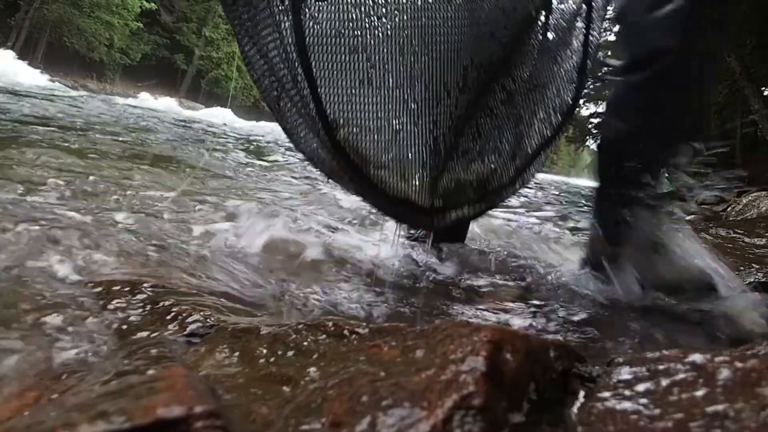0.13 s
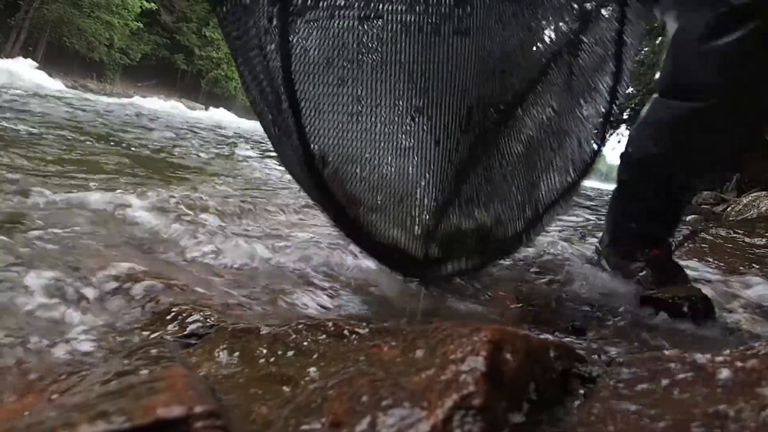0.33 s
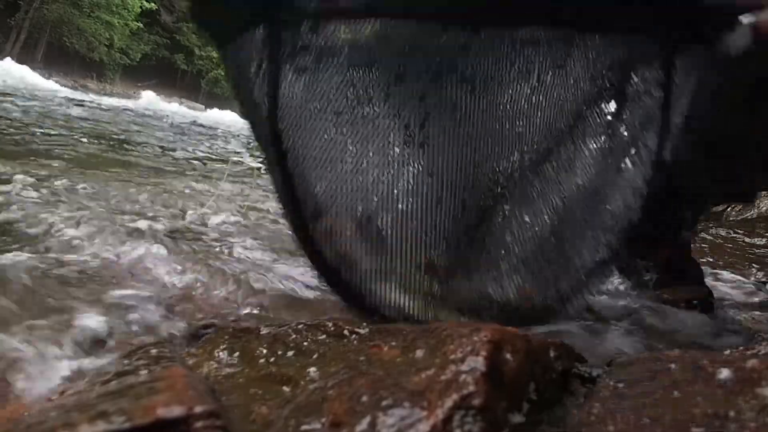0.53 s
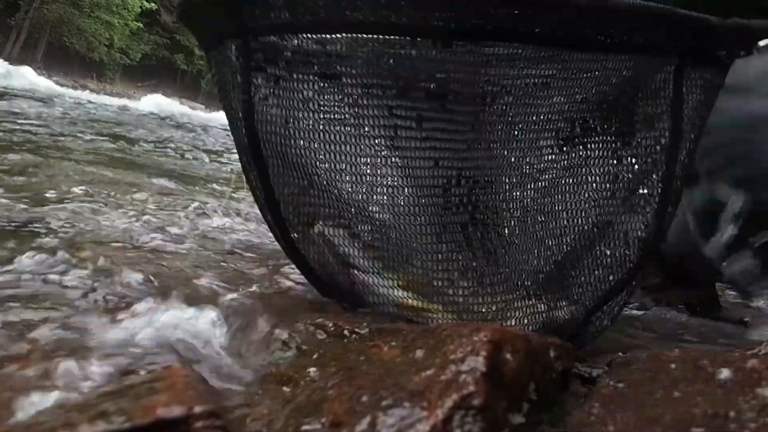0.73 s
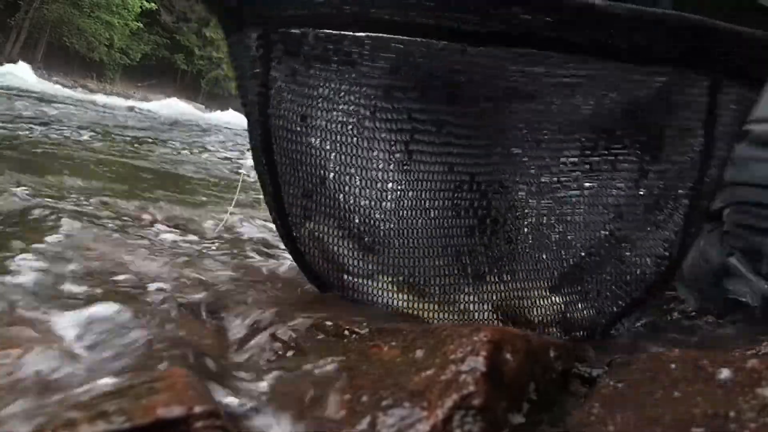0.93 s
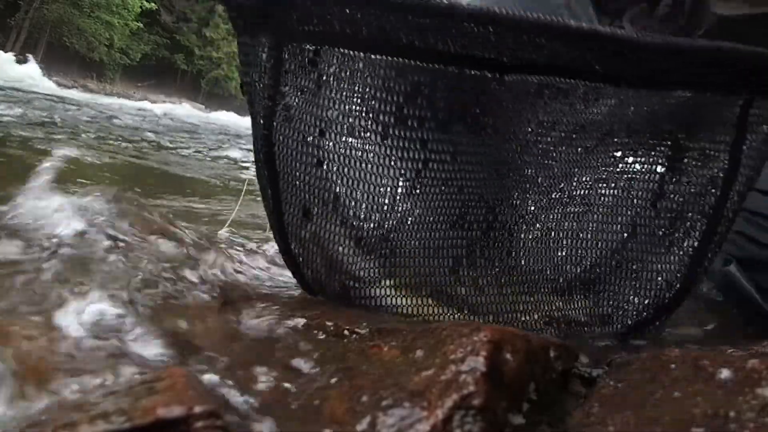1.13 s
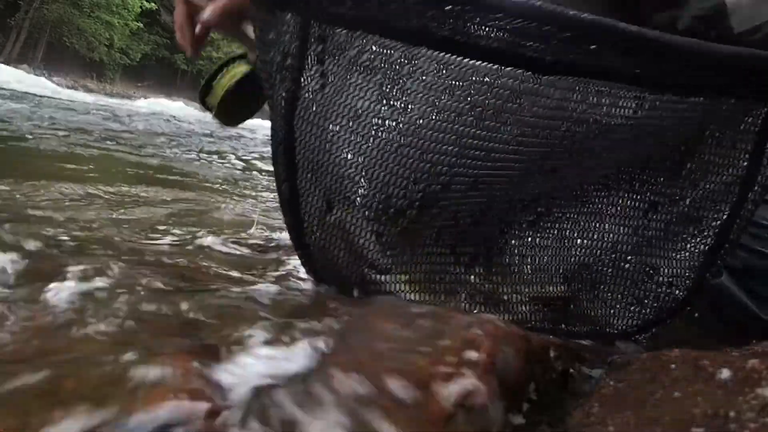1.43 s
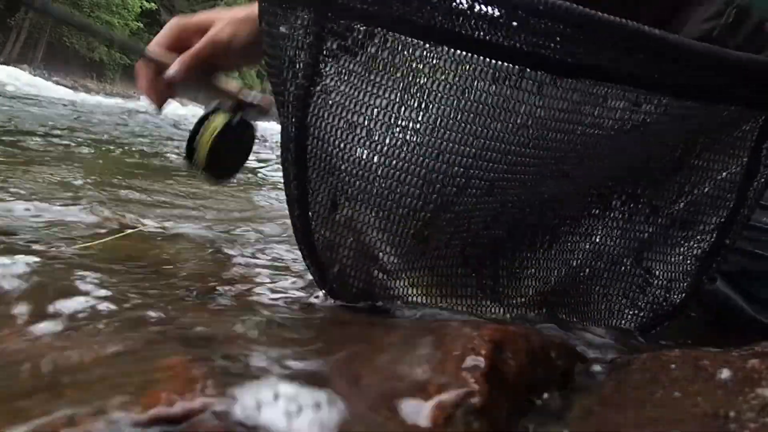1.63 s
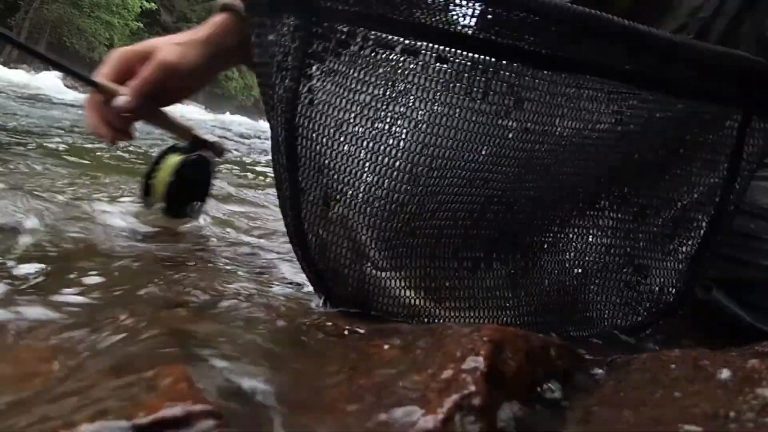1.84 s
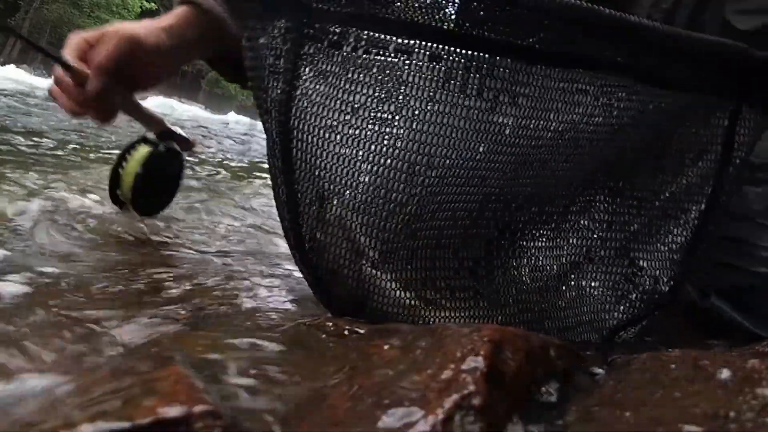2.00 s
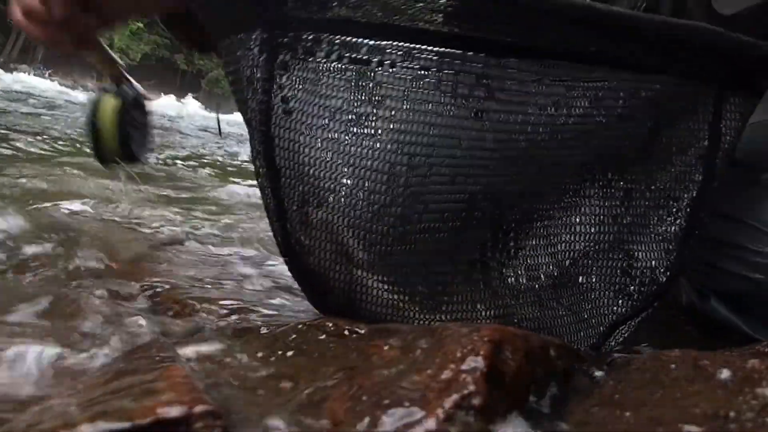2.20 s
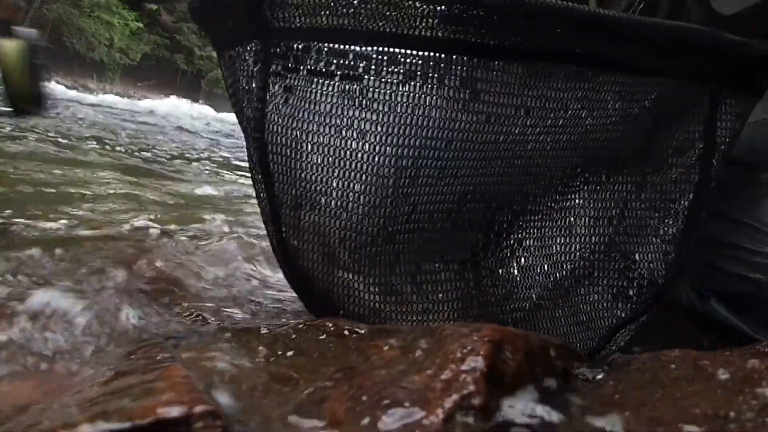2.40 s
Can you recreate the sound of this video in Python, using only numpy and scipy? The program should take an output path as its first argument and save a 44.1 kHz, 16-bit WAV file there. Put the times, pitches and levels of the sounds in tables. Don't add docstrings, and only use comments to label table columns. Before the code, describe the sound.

Continuous river rush at the water's edge, heard close through a small sealed, slightly boxy, coloured microphone. Brief gear clicks, little water splats and faint drop plinks dot the flow; the loudest clack lands just before the end.

```python
import sys
import numpy as np
from scipy import signal
from scipy.fft import rfft, irfft, next_fast_len
from scipy.io import wavfile
from scipy.ndimage import uniform_filter1d, map_coordinates

SR = 44100
rng = np.random.default_rng(int(sys.argv[2]) if len(sys.argv) > 2 else 0)


def decibels_to_gain(level_db):
    exponent = np.asarray(level_db, float) / 20
    return 10 ** exponent


def store_wav(level_fs):
    pcm = np.round(np.clip(np.atleast_2d(level_fs), -1, 1) * 32767)
    wavfile.write(sys.argv[1], SR, pcm.T.astype(np.int16))


N = 112896

# (time [s], level [dB])
FLOW = [(.08, -21.5), (.5, -22), (.9, -21.5), (1.3, -21.5), (1.7, -22), (2.1, -21.5), (2.56, -21.5)]
# (frequency [Hz], density [dB per Hz])
ROAR_SPECTRUM = [(15, -73), (25, -50), (32, -40), (106, -9.5), (151, -8), (301, -3), (549, -5), (854, -6),
                 (1700, -20), (2210, -20.5), (3740, -120)]
# (frequency [Hz], density [dB per Hz])
SPRAY_SPECTRUM = [(500, -20), (1500, 8), (3000, 1.5), (5500, 1.5), (8500, -10), (10000, -24.5),
                  (16000, -41)]
# (time [s], length [s], level [dB], brightness [dB per octave])
SPLASHES = [(0.084, .025, -28.5, 2), (0.087, 0.21, -44, 11), (0.117, 0.048, -26.5, -3),
            (0.483, 0.029, -20.5, -6), (.5, 0.028, -29, -3), (.58, 0.047, -36, 1),
            (0.621, 0.025, -25.5, -6), (1.393, 0.014, -37, -3), (1.434, 0.014, -30, 0),
            (1.549, 0.017, -25, -3), (1.633, 0.037, -32, -5), (2.508, .015, -34, 0), (0.153, .03, -33, -5),
            (0.238, 0.061, -38, 8), (2.432, 0.063, -33, 1)]
# (time [s], peak [dB], t60 [s], brightness [dB per octave])
TICKS = [(.0875, -12, 0.012, 0), (0.131, -11, .015, -7), (0.488, -12.5, 0.011, 2.5), (.588, -20, .02, 3),
         (.6098, -13.5, .012, 2), (0.627, -13, .012, -6), (.635, -13, .015, -9.5),
         (0.6413, -8.5, 0.011, -11.5), (1.4287, -14, 0.019, -3), (1.441, -22, .02, -18),
         (1.547, -16, 0.025, 8), (1.6395, -16, 0.02, 3.5), (2.506, -16, .03, -7),
         (2.5276, 3.5, 0.0049, 9.5), (2.5307, 8, 0.017, 3), (2.534, -1, .02, -7.5),
         (2.5366, -0.5, 0.027, -3), (2.542, -4, 0.014, 3)]
# (frequency [Hz], gain [dB])
CONTACT_COLOUR = [(600, -14), (1500, -9.5), (4000, 0), (7000, -4), (10000, -11.5), (16000, -17.5)]
# (frequency [Hz], width [Hz], gain [dB])
CONTACT_RING = [(5150, 790, 3), (8150, 1100, 4)]
# (time [s], level [dB], frequency [Hz])
DRIPS = [
    (0.163, -9, 2230),
    (0.629, -7, 1590),
    (.630, -17, 2300),
    (.731, -14, 1720),
    (1.024, -16, 2150),
]
# (frequency [Hz], width [Hz], gain [dB])
HOUSING = [(1891, 180, -10.5), (2630, 600, -9), (3400, 233, -9), (4028, 766, -17), (4820, 117, -14),
           (5330, 2060, 8.5), (7970, 840, 7)]
# (frequency [Hz], left-right correlation [0-1])
PORT_LIKENESS = [(60, 0.84), (130, 0.94), (290, 1), (640, 1), (1410, 0.98), (3100, 0.93), (6820, 0.48),
                 (15000, 0.11)]
# (frequency [Hz], left over right [dB])
PORT_BALANCE = [(60, 3), (180, 5.0), (550, 4.5), (1650, 4.5), (4970, 2), (15000, 2.5)]
# (frequency [Hz], left lead [rad])
PORT_LEAD = [(4000, 0.026), (6000, .3), (9000, 0.78), (12000, 1.5)]
# (time [s], depth [dB])
DUCKS = [
    (.497, -0.5),
    (0.645, 7.5),
    (1.553, 2.5),
    (2.528, 14.5),
]


def unit(x):
    return x / np.sqrt(np.mean(x ** 2) + 1e-20)


def along(points, hz):
    f, v = np.transpose(points)
    return np.interp(np.log(hz + 1), np.log(f + 1), v)


def wobble(rate_hz):
    knots = rng.standard_normal(int(N * rate_hz / SR) + 4)
    return map_coordinates(knots, [np.arange(N) * rate_hz / SR])


def filtered(x, response):
    m = next_fast_len(x.shape[-1] + 8192)
    spectrum = rfft(x, m) * response(np.fft.rfftfreq(m, 1 / SR))
    return irfft(spectrum, m)[..., :x.shape[-1]]


def causal(gain_db):
    def response(hz):
        cepstrum = irfft(gain_db(hz) * np.log(10) / 20)
        half = len(cepstrum) // 2
        cepstrum[1:half] *= 2
        cepstrum[half + 1:] = 0
        return np.exp(rfft(cepstrum))
    return response


def resonances_db(table, hz):
    return sum(db / (1 + (2 * (hz - c) / w) ** 2) for c, w, db in table)


def rush(spectrum, patchy_db):
    z = signal.stft(rng.standard_normal((2, N + 512)), nperseg=512)[2]
    field = uniform_filter1d(rng.standard_normal(z.shape[1:]), size=6, axis=0)
    field = uniform_filter1d(field, size=10, axis=1)
    pair = signal.istft(z * decibels_to_gain(patchy_db * unit(field)), nperseg=512)[1][:, :N]
    return unit(filtered(pair, lambda hz: decibels_to_gain(along(spectrum, hz))))


def bubbles(count, size, centre_hz, scatter, cycles, spread_db):
    u = rng.random((count, 3))
    t = np.arange(size) / SR
    hz = np.clip(centre_hz * np.exp(scatter * rng.standard_normal((count, 1))), 100, 15000)
    k = hz * t / cycles
    level = decibels_to_gain(-spread_db * np.log(1 - .97 * u[:, 1:2]))
    rows = level * k * np.exp(-3 * k) * np.sin(2 * np.pi * hz * t * (1 + 0.1105 * k))
    at = ((u[:, :1] * N).astype(int) + np.arange(size)).ravel()
    turn = 2 * np.pi * u[:, 2:]
    sides = [np.bincount(at, (rows * w).ravel(), N + size)[:N] for w in (np.cos(turn), np.sin(turn))]
    return unit(np.array(sides))


def river():
    s, db = np.transpose(FLOW)
    swell_db = np.interp(np.arange(N) / SR, s, db - db.mean()) + 0.13 * wobble(10.08)
    roar = rush(list(ROAR_SPECTRUM) + [(2600, -87)], patchy_db=-0.22)
    gurgle = bubbles(count=1500, size=1500, centre_hz=604.3, scatter=0.594, cycles=8.1, spread_db=2)
    roar = roar + decibels_to_gain(-3.5) * gurgle
    spray = rush(SPRAY_SPECTRUM, patchy_db=1.54)
    fizz = bubbles(count=6000, size=100, centre_hz=5730, scatter=0.41, cycles=1.9, spread_db=0.5)
    spray = spray + decibels_to_gain(-12) * fizz
    spray_db, swell_share = -7.5, 1
    spray = spray * decibels_to_gain(spray_db + swell_share * swell_db + 0.66 * wobble(6) + 0.67 * wobble(14))
    return decibels_to_gain(db.mean()) * (decibels_to_gain(swell_db) * roar + spray)


def contact_colour(x, bright_db_per_octave):
    def gain_db(hz):
        tilt = np.clip(bright_db_per_octave, -3, 8) * np.log2(np.clip(hz, 1500, None) / 6000)
        low_cut = 40 / (1 + (hz / 400) ** 2)
        return along(list(CONTACT_COLOUR) + [(20000, -18)], hz) + tilt - low_cut
    return filtered(x, causal(gain_db))


def splashes():
    lumpy_db, lump_rate_hz = 3.5, 386
    out, t = np.zeros((2, N + SR)), np.arange(16384) / SR
    for s, length_s, db, bright in SPLASHES:
        u = np.clip(t / length_s, 0, 1)
        noise = contact_colour(rng.standard_normal((2, len(t))), bright)
        spatter = unit(noise * decibels_to_gain(lumpy_db * wobble(lump_rate_hz)[:len(t)]))
        start = round(s * SR)
        out[:, start:start + len(t)] += decibels_to_gain(db) * spatter * np.sin(np.pi * u ** 0.38)
    return out[:, :N]


def ticks():
    level_db, rise_s, port_difference_db = 0.5, 0.00011, -14
    out, t = np.zeros((2, N + SR)), np.arange(4096) / SR
    for s, db, t60_s, bright in TICKS:
        envelope = decibels_to_gain(-60 * t / np.clip(t60_s, .002, .05)) * (1 - np.exp(-t / rise_s))
        burst = contact_colour(rng.standard_normal((2, len(t))) * envelope, bright)
        burst = filtered(burst, causal(lambda hz: resonances_db(CONTACT_RING, hz)))
        burst = burst / np.abs(burst).max(axis=1, keepdims=True) * decibels_to_gain([[0], [port_difference_db]])
        start = round(s * SR)
        out[:, start:start + len(t)] += decibels_to_gain(db + level_db) * burst
    return out[:, :N]


def drips():
    t60_s, pitch_rise, attack_s = 0.02, 0.074, 0.0018
    out, t = np.zeros((2, N + SR)), np.arange(4096) / SR
    for s, db, hz in DRIPS:
        ring = np.sin(2 * np.pi * hz * t * (1 + pitch_rise * t / t60_s)) * (1 - np.exp(-t / attack_s))
        start = round(s * SR)
        out[0, start:start + len(t)] += decibels_to_gain(db - 60 * t / t60_s) * ring
    return out[:, :N]


def ports(pair):
    def mid_side(hz):
        turn = np.arccos(np.clip(along(PORT_LIKENESS, hz), -1, 1)) / 2
        return np.array([np.cos(turn), np.sin(turn)])

    def offset(hz):
        sign = np.array([[.5], [-.5]])
        return decibels_to_gain(sign * along(PORT_BALANCE, hz)) * np.exp(1j * sign * along(PORT_LEAD, hz))

    mid, side = filtered(pair, mid_side)
    return filtered(np.array([mid + side, mid - side]), offset)


def scene():
    return ports(river() + splashes() + ticks() + drips())


def gain_control_db(t):
    grab_s, release_s = 0.00067, 0.055
    total_db = 0
    for s, depth_db in DUCKS:
        late = np.clip(t - s, 0, None)
        total_db = total_db + depth_db * (1 - np.exp(-late / grab_s)) * np.exp(-late / release_s)
    return -total_db


def roll_off(x):
    return signal.sosfilt(signal.butter(12, 16400, fs=SR, output="sos"), x)


def record(dry):
    hiss_db, start_s, fade_s, ceiling = -40, 0.0813, 0.0028, .97
    shelf_hz, shelf_db, top_hz = 15150, -6, 15700
    t = np.arange(N) / SR
    hiss = filtered(rng.standard_normal((2, N)), lambda hz: hz / (hz + 3000))
    x = filtered(dry, causal(lambda hz: resonances_db(HOUSING, hz))) + decibels_to_gain(hiss_db) * hiss
    fade_in = np.sin(np.pi / 2 * np.clip((t - start_s) / fade_s, 0, 1)) ** 2
    x = x * decibels_to_gain(gain_control_db(t)) * fade_in
    x = x / (1 + np.abs(x / ceiling) ** 10) ** (1 / 10)
    mix = filtered(x, lambda hz: (hz < top_hz) * decibels_to_gain(shelf_db * (hz > shelf_hz)))
    return roll_off(mix)


dry = scene()
out = record(dry)
store_wav(out)
```